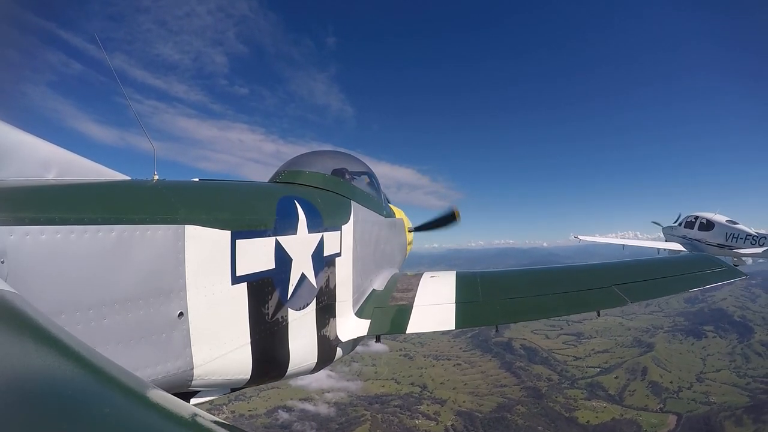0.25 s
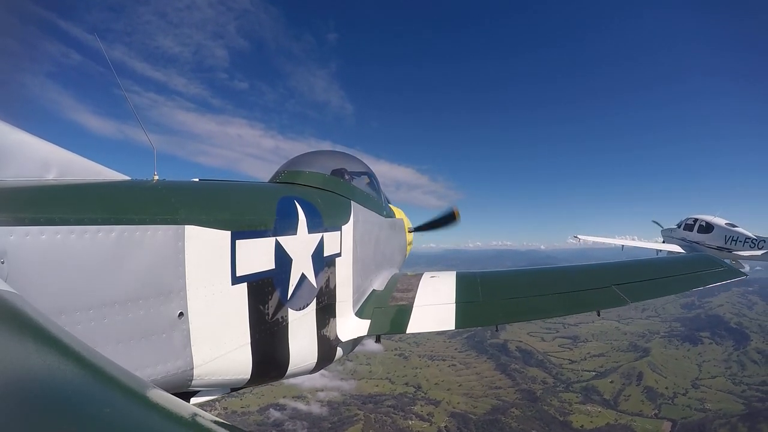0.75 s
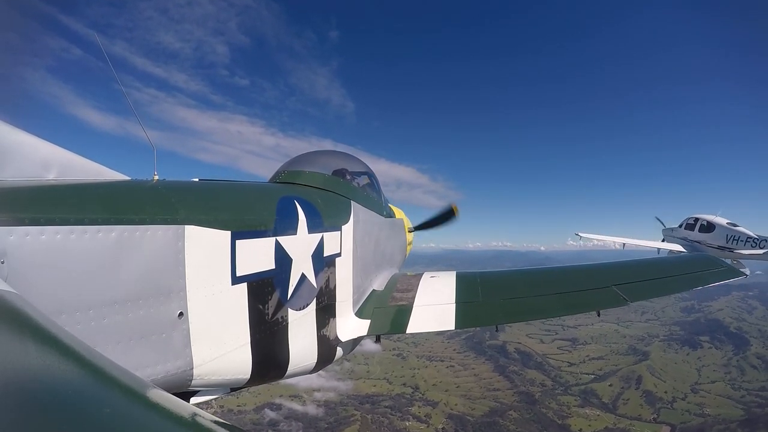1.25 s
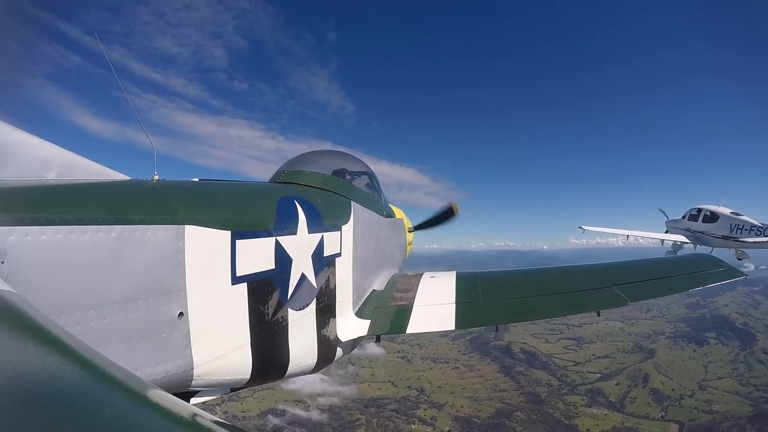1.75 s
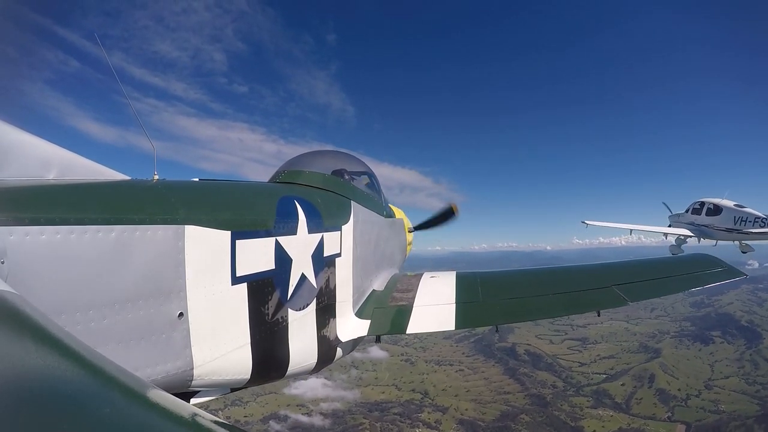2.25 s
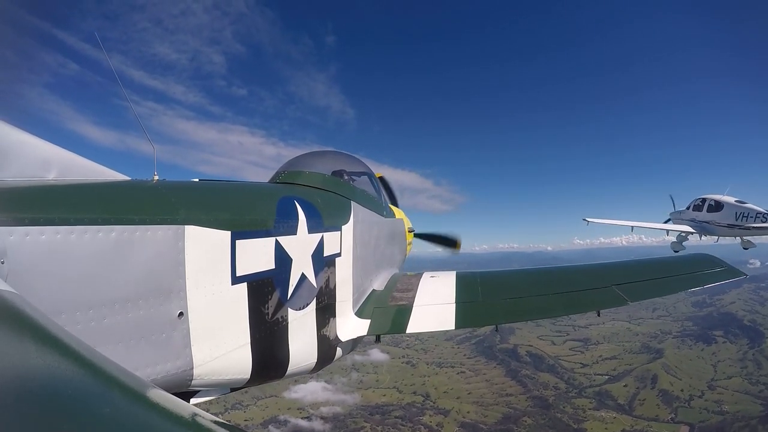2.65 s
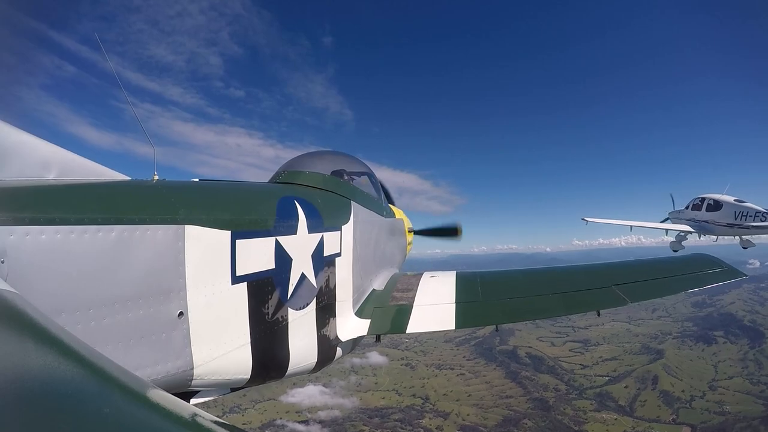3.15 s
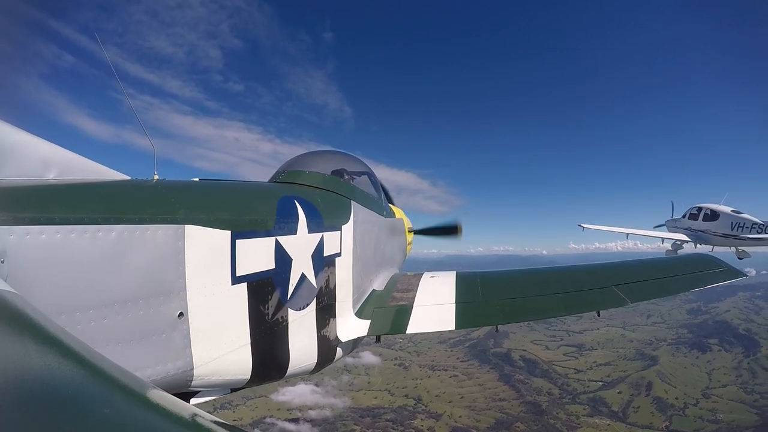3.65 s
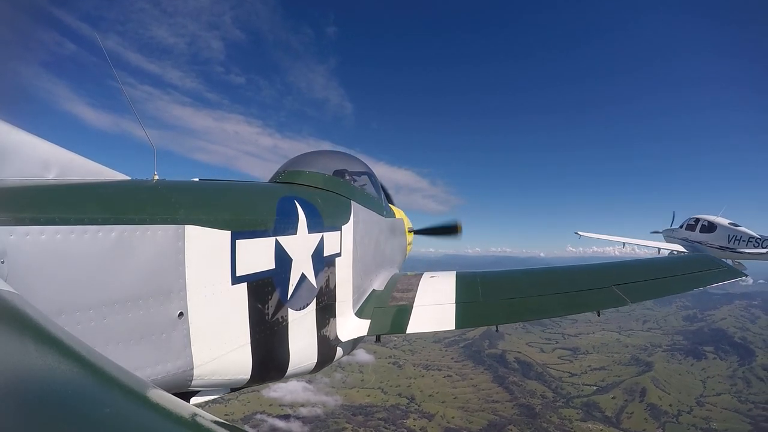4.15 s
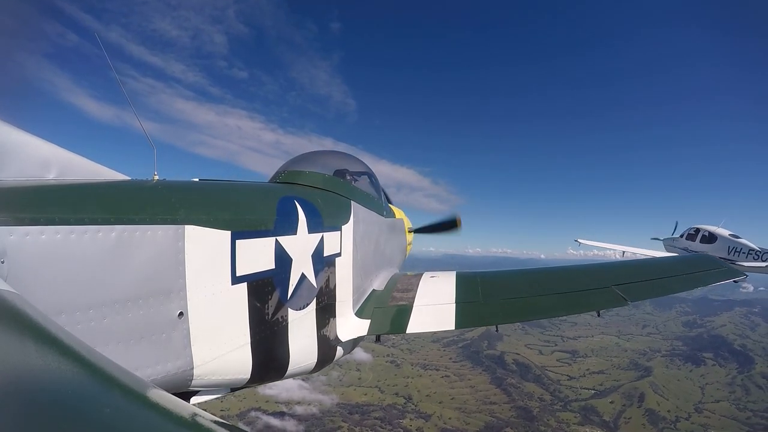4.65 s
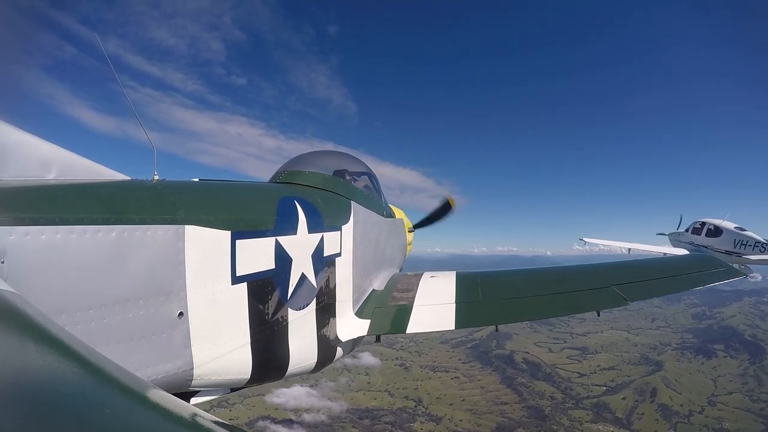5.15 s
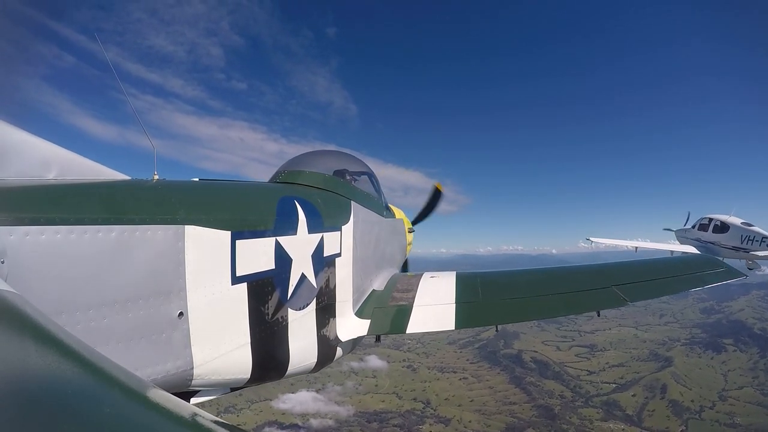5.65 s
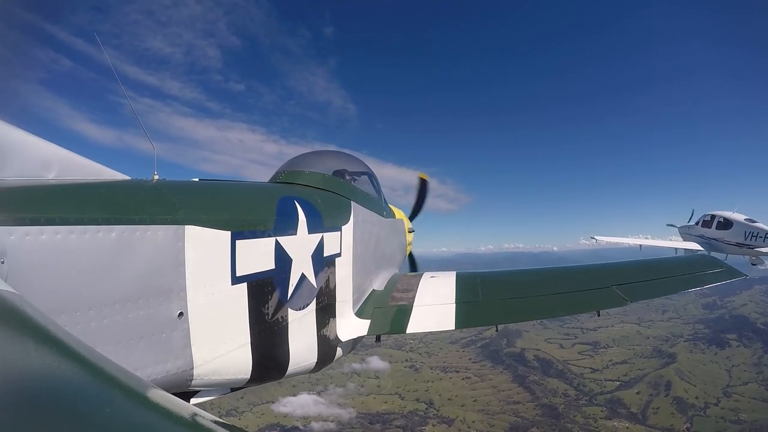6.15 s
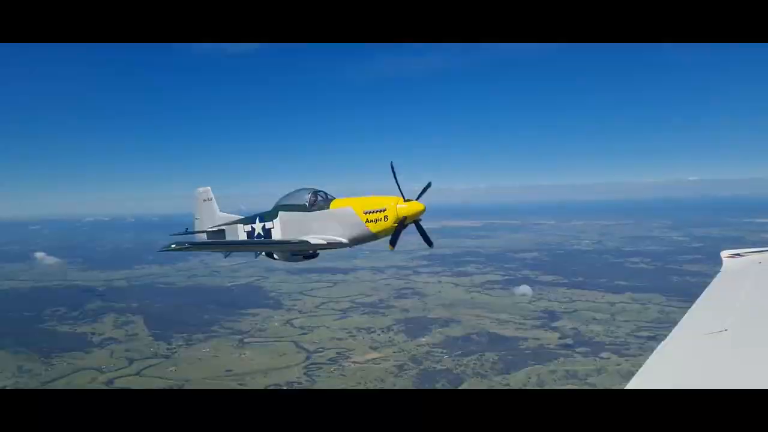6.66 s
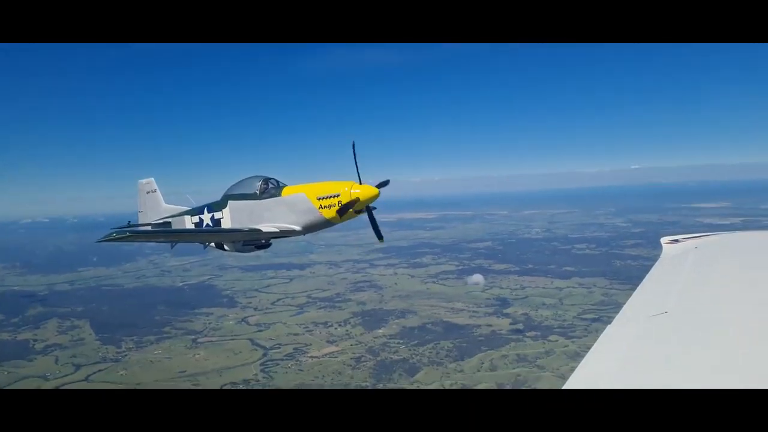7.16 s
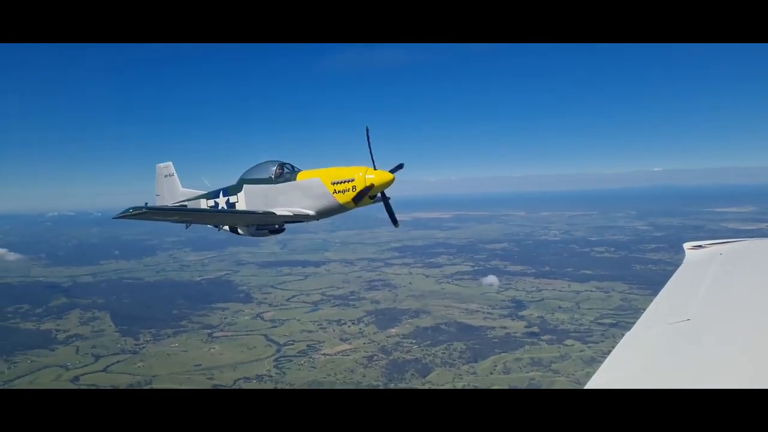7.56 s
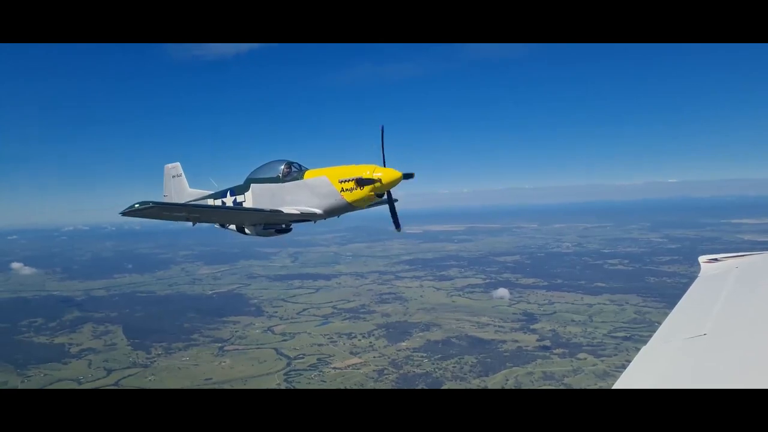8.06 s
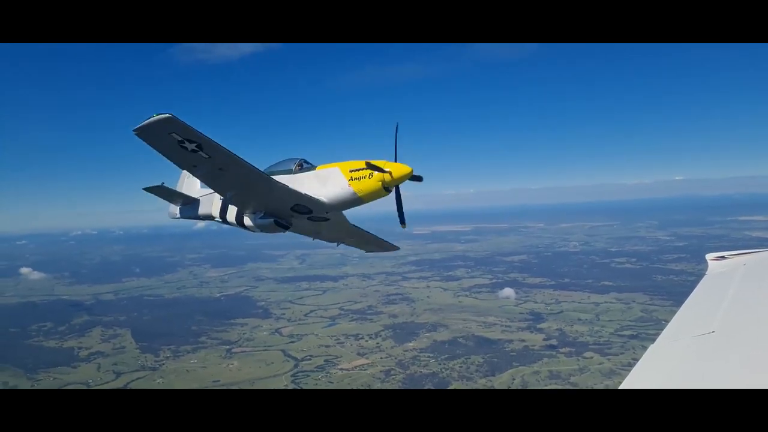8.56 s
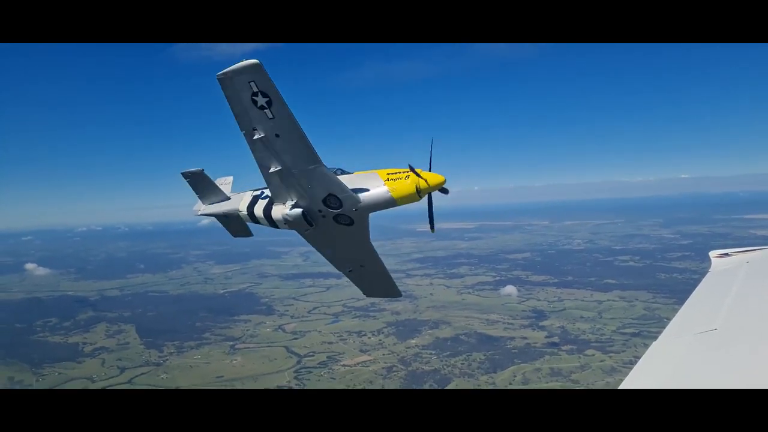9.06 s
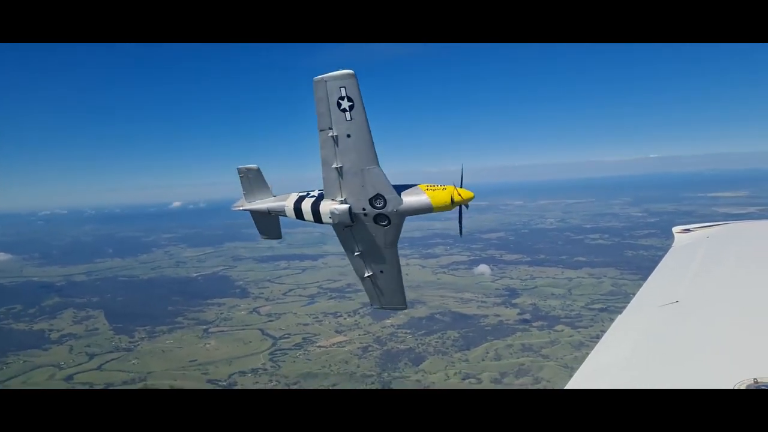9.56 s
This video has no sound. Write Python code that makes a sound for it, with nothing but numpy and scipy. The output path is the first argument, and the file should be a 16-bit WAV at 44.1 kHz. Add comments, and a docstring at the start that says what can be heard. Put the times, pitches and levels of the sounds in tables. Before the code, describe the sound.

Steady buzzing piston-engine drone with slipstream and hiss, an abrupt cut at midflight, then a louder, lower cabin roar with a wavering neighbouring engine.

```python
"""In the air, two light aircraft in formation, heard in two scenes. First mono, from aboard one: engine
orders drone, a geared propeller beats, each firing puffs out exhaust noise, and shaped noise makes the
slipstream and hiss. The level jumps briefly, then cuts to silence. Then stereo, in the cabin of the other:
a slower engine booms as sine orders, with noise for roar and airflow, and the neighbour's engine as wavering sines."""
import sys
import numpy as np
from scipy import signal
from scipy.fft import rfft, irfft, next_fast_len
from scipy.io import wavfile
from scipy.ndimage import uniform_filter1d, map_coordinates

SR = 44100
rng = np.random.default_rng(int(sys.argv[2]) if len(sys.argv) > 2 else 0)


def makeup_ratio(level_db):
    """Linear amplitude ratio for a level in decibels (20 dB per factor of ten)."""
    decades = np.asarray(level_db, float) / 20
    return 10 ** decades


def digitize_waveform(pressure):
    """Quantize a signal to 16-bit integers and store it at the path in sys.argv[1].

    Rows of a 2-D input are taken as channels; values are limited to [-1, 1].
    """
    field = np.atleast_2d(pressure).T
    bounded = np.clip(field, -1, 1)
    quanta = np.round(bounded * 32767).astype(np.int16)
    wavfile.write(sys.argv[1], SR, quanta)


N = 432180


def unit(x):
    """Scaled to rms 1."""
    return x / np.sqrt(np.mean(x ** 2) + 1e-20)


def along(points, hz):
    """Reads (Hz, value) points on a log frequency axis."""
    f, v = np.transpose(points)
    return np.interp(np.log(hz + 1), np.log(f + 1), v)


def curve(rows):
    """One value per sample from (s, value) rows."""
    return np.interp(np.arange(N) / SR, *np.transpose(rows))


def wobble(rate):
    """A random curve: normal values, rate of them a second, joined by straight lines."""
    knots = rng.standard_normal(int(N * rate / SR) + 4)
    return map_coordinates(knots, [np.arange(N) * rate / SR], order=1)


def step(start_s, length_s):
    """Rises from 0 to 1 over length_s from start_s on."""
    return np.clip((np.arange(N) / SR - start_s) / length_s, 0, 1)


def filtered(x, response):
    """x times a response of frequency."""
    m = next_fast_len(N + 8192)
    return irfft(rfft(x, m) * response(np.fft.rfftfreq(m, 1 / SR)), m)[..., :N]


def density(points, hz):
    """Gain that gives unit white noise this dB per Hz, falling away past both ends."""
    below = (points[0][0] / 2, -140)
    above = (min(points[-1][0] * 2, SR), -140)
    return makeup_ratio(along([below, *map(tuple, points), above], hz)) * np.sqrt(SR / 2)


def resonant(modes):
    """Response of damped resonances added to an even direct path."""
    def response(hz):
        return 1 + sum(makeup_ratio(db) * 1j * hz * width / (centre ** 2 - hz ** 2 + 1j * hz * width)
                       for centre, width, db in modes)
    return response


def patchy(channels, patchy_db):
    """White noise whose gain varies in random patches of time and frequency, alike in all channels."""
    z = signal.stft(rng.standard_normal((channels, N)), nperseg=512)[2]
    patches = uniform_filter1d(rng.standard_normal(z.shape[1:]), size=6, axis=0)
    patches = uniform_filter1d(patches, size=10, axis=1)
    noise = signal.istft(z * makeup_ratio(patchy_db * unit(patches)), nperseg=512)[1]
    return unit(noise[:, :N])


def cycles(rpm, unsteady):
    """Four-stroke cycles so far, one per two crank turns; the crank runs slightly ahead or behind."""
    steady = np.cumsum(curve(rpm) / (2 * 60) / SR)
    return steady + unsteady * (3 + wobble(2))  # the 3 starts the count above zero


def tone(turns, db, waver_db, drift, lead=0):
    """A sine of db rms that wavers in level and drifts in phase (drift and lead in radians)."""
    level = np.sqrt(2) * makeup_ratio(db + waver_db * wobble(5))
    return level * np.cos(2 * np.pi * turns + drift * wobble(3) + lead)


def faint(orders, strong):
    """The orders of the range that do not stand out."""
    standing_out = [row[0] for row in strong]
    return [k for k in orders if k not in standing_out]


def first_engine(cycle):
    """Orders of the cycle; phases advance by one quadratic rule below order 26 and another above."""
    # engine orders that stand out: order (multiple of the four-stroke cycle), level_db (rms)
    strong = [(2, -41), (3, -43), (5, -49), (6, -24), (7, -43), (8, -42), (9, -39), (10, -37), (11, -49),
              (12, -41), (13, -49), (15, -46), (16, -42), (18, -47), (19, -46), (21, -53), (22, -51),
              (24, -58), (25, -57), (28, -55), (29, -51.5), (30, -53.5), (31, -49.5), (35, -50.5),
              (36, -57), (37, -59), (39, -59), (41, -54), (42, -56), (72, -55)]
    weak_db, scatter_db = -64.5, 2
    weak = [(k, weak_db + scatter_db * rng.standard_normal()) for k in faint(range(14, 49), strong)]

    def phase_turns(k):
        if k < 26:
            return .1952 * k * k
        return .0836 * k * k + .347 * k + .34

    return sum(tone(k * cycle + phase_turns(k), db, waver_db=.3 + .02 * k, drift=.004 * k)
               for k, db in [*strong, *weak])


def propeller(cycle):
    """The propeller, geared down from the crank, beats at multiples of its shaft's turning."""
    # propeller tones: multiple (of shaft turning), level_db (rms)
    beats = [(1, -32), (2, -47.5), (4, -54.5)]
    shaft = 2 * .467 * cycle  # two crank turns a cycle, .467 propeller turns per crank turn
    return sum(tone(k * shaft, db, waver_db=.4 * k, drift=.17 * k) for k, db in beats)


def rasp(cycle):
    """The banks fire in turn; every firing lets out a puff of noise of its own strength."""
    # where each bank fires: lead (share of its firing interval)
    bank_leads = [.16, .72]
    # rasp of each bank, ahead of level, echoes and resonances: frequency_hz, density_db_per_hz
    bank_spectra = [
        [(1200, -78), (2000, -74), (2600, -75), (3300, -67), (3800, -68.5), (4300, -74), (5200, -83),
         (7000, -81), (10000, -88.5), (13000, -88), (15000, -90)],
        [(600, -81), (1000, -73.5), (2000, -74.5), (3300, -84), (5000, -73), (7000, -75), (10000, -86),
         (15000, -110)],
    ]
    # usual firing strength of the three cylinders in each bank, relative: strength_db
    cylinder_habits = [
        [0, .8, .5],
        [0, 1, -0.38],
    ]
    sound = 0
    for lead, spectrum, habit_db in zip(bank_leads, bank_spectra, cylinder_habits):
        turn = 3 * cycle + lead  # three firings per bank in a cycle
        firing = turn.astype(int)
        scatter_db = 4.1 * rng.uniform(-1.15, 1, firing[-1] + 2)
        strength = makeup_ratio(scatter_db[firing] + np.take(habit_db, firing, mode="wrap"))
        since = turn % 1  # share of the time to this bank's next firing
        puff = .093 + since ** 2.4 * np.exp(-since / .063) / .0013  # on a steady floor
        gate = unit(strength * puff * makeup_ratio(1.1 * wobble(8.9)))
        sound = sound + filtered(gate * rng.standard_normal(N), lambda hz: density(spectrum, hz))
    return sound


def air_hiss():
    """Steady air hiss: slightly patchy noise, shaped."""
    # hiss ahead of level, echoes and resonances: frequency_hz, density_db_per_hz
    spectrum = [(1200, -82), (2200, -75), (2600, -75.5), (3700, -67.5), (4300, -72.5), (5150, -70.5),
                (5500, -73.5), (7000, -76), (11000, -88.5), (14300, -90), (15400, -102)]
    return filtered(patchy(channels=1, patchy_db=.7)[0], lambda hz: density(spectrum, hz))


def slipstream():
    """Slipstream rumble: slightly patchy noise, strongest in the bass."""
    # slipstream: frequency_hz, density_db_per_hz
    spectrum = [(20, -67), (28, -63), (45, -57), (65, -56.5), (110, -55.5), (200, -61.5), (290, -62.5),
                (330, -69), (375, -61), (425, -69), (515, -63.5), (590, -68.5), (800, -73.5), (1500, -76.5)]
    return filtered(patchy(channels=1, patchy_db=.2)[0], lambda hz: density(spectrum, hz))


def nearby_echoes():
    """Short echoes off nearby surfaces, at random delays, ripple the treble's spectrum."""
    count = 24
    delays_ms = rng.uniform(1, 12, count)
    gains = makeup_ratio(-21) * rng.standard_normal(count)
    return lambda hz: 1 + sum(gain * np.exp(-2j * np.pi * hz * ms / 1000)
                              for ms, gain in zip(delays_ms, gains))


def first_camera():
    """All the first camera hears, in mono; the treble echoes nearby and rings in the camera housing."""
    # first aircraft's engine speed: time_s, crank_rpm
    speed = [(0, 4110), (3.8, 4108), (4.5, 4103.5), (5.6, 4100), (6.7, 4095)]
    # ringing of the camera housing: frequency_hz, width_hz, level_db (over the direct path)
    housing = [(2450, 51, -3.5), (2644, 103, 4), (2865, 110, -1), (3135, 64, -2), (3336, 43, -3),
               (3423, 32, -1), (3614, 53, -2), (3825, 70, 0.5), (4245, 42, 1.5), (4390, 61, 2.5),
               (4686, 37, 4.5), (4920, 60, -1), (5100, 71, -5), (5390, 36, -4)]
    cycle = cycles(speed, unsteady=.0023)
    treble = makeup_ratio(-2.5) * (rasp(cycle) + air_hiss())  # treble level, 2.5 dB down
    echoes, ringing = nearby_echoes(), resonant(housing)
    treble = filtered(treble, lambda hz: echoes(hz) * ringing(hz) * (hz < 15300))
    sound = first_engine(cycle) + propeller(cycle) + slipstream() + treble
    # a jump of 11 dB, half of it lost again, then the cut to silence
    blip = makeup_ratio(11 * step(6.578, .002) - 5.5 * step(6.606, .002))
    return sound * blip * (1 - step(6.6128, .0006))


def cabin_engine():
    """Cabin standing waves give each order its own level and phase at either microphone."""
    # cabin aircraft's engine speed: time_s, crank_rpm
    speed = [(6.6, 2558), (8.2, 2559.5), (8.9, 2560.5), (9.8, 2560)]
    # orders that stand out: order (multiple of the four-stroke cycle), left_db (rms), right_db (rms),
    # lead_rad (left ahead of right)
    strong = [(2, -38, -35, 0.4), (3, -28, -31, -0.1), (4, -31, -29, 0.2), (6, -17, -14, 0.2),
              (8, -33, -33, 0.5), (9, -24, -26, 0.5), (10, -34, -48, 0.4), (11, -35, -35, -0.1),
              (12, -21, -28, -0.6), (13, -36, -42, 0.6), (14, -31, -37, 0.4), (15, -22, -23, -1.3),
              (18, -22, -26, -1.7), (21, -35, -25, 1.2), (24, -27, -31, 0.6), (25, -37, -35, 2.2),
              (26, -25, -33, 0.7), (27, -38, -26, -3.0), (28, -44, -40, -0.8), (31, -40, -38, 1.8)]
    cycle = cycles(speed, unsteady=.002)
    lowest, weak_db, fall_db_per_order, scatter_db = 16, -38.5, .96, .5
    weak = []
    for k in faint(range(lowest, 43), strong):
        level_db = weak_db - fall_db_per_order * (k - lowest)
        sides_db = level_db + scatter_db * rng.standard_normal(2)
        weak.append((k, *sides_db, rng.uniform(-np.pi, np.pi)))
    sound = 0
    for k, left_db, right_db, lead in [*strong, *weak]:
        sides_db = np.array([[left_db], [right_db]])
        leads = np.array([[lead / 2], [-lead / 2]])
        turns = k * cycle + .2055 * k * k  # phase advances with the square of the order
        sound = sound - tone(turns, sides_db, waver_db=.3, drift=.004 * k, lead=leads)
    return sound


def neighbour():
    """The other aircraft's engine: a few steady pitches that waver widely, alike on both sides."""
    # neighbour's tones: pitch_hz, level_db (rms, before the waver)
    pitches = [(102.7, -27), (205.4, -32.5), (273.9, -54), (376.5, -38), (410.8, -44.5)]
    seconds = np.arange(N) / SR
    return sum(tone(hz * seconds, db, waver_db=5, drift=.0011 * hz) for hz, db in pitches)


def cabin_roar():
    """Roar noise as mid and side, mixed so that left and right are as alike as each frequency asks."""
    # mid part of the roar ahead of the panels: frequency_hz, density_db_per_hz
    spectrum = [(20, -60), (40, -57), (70, -44.5), (110, -51), (140, -49.5), (200, -46.5), (300, -56),
                (450, -56), (600, -55), (720, -56.5), (800, -59.5), (1100, -66.5), (1400, -65.5),
                (2000, -75)]
    # likeness of left and right: frequency_hz, correlation (-1 to 1)
    likeness = [(60, 0.56), (130, 0.81), (290, 0.55), (640, -0.58), (1400, -0.51), (3100, 0.12)]

    def mid_side(hz):
        angle = np.arccos(np.clip(along(likeness, hz), -.95, .99)) / 2
        return density(spectrum, hz) * [1 + 0 * hz, np.tan(angle)]

    mid, side = filtered(patchy(channels=2, patchy_db=.4), mid_side)
    return np.array([mid + side, mid - side])


def cabin_airflow():
    """Gusting air hiss, separate noise with its own spectrum at each microphone port."""
    # hiss at the left port, ahead of gusts and panels: frequency_hz, density_db_per_hz
    left = [(1200, -101), (2000, -67), (3100, -74), (4000, -77.5), (5500, -77), (7000, -89), (9000, -84),
            (13500, -83.5), (15600, -88)]
    # hiss at the right port, ahead of gusts and panels: frequency_hz, density_db_per_hz
    right = [(1200, -79), (2000, -66), (3100, -71.5), (4700, -75.5), (5800, -80.5), (6600, -108),
             (9000, -94.5), (12700, -90), (15600, -92)]
    noise = patchy(channels=2, patchy_db=1.34)
    hiss = filtered(noise, lambda hz: np.array([density(left, hz), density(right, hz)]))
    return makeup_ratio(.69 * wobble(4.1)) * hiss


def cabin_camera():
    """All the cabin camera hears, in stereo; roar and airflow ring in the cabin panels."""
    # resonances of the cabin panels: frequency_hz, width_hz, level_db (over the direct path)
    panels = [(1540, 170, -6), (2170, 180, -10.5), (3120, 120, -1.5), (4570, 230, -6), (6030, 160, -6)]
    noise = filtered(cabin_roar() + cabin_airflow(), resonant(panels))
    return step(6.659, .00079) * (cabin_engine() + neighbour() + noise)


def scene():
    """The first scene in mono, then the cabin scene in stereo."""
    return first_camera() + cabin_camera()


def top_cut(x):
    """Nothing passes above the cut-off."""
    return signal.sosfilt(signal.butter(12, 15640, fs=SR, output="sos"), x)


def record(dry):
    """The input stage rounds off the tallest peaks, towards a ceiling of 0.95."""
    rounded = dry / (1 + np.abs(dry / .95) ** 6) ** (1 / 6)
    return top_cut(rounded)


dry = scene()
out = record(dry)
digitize_waveform(out)
```